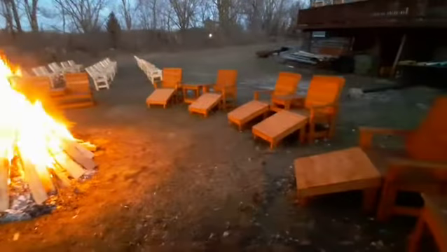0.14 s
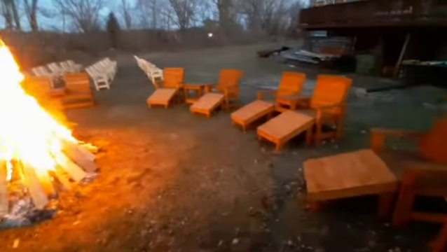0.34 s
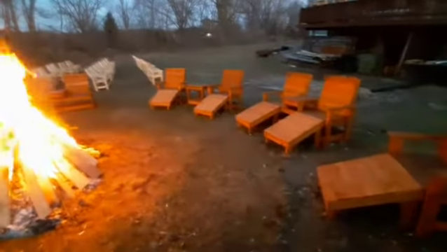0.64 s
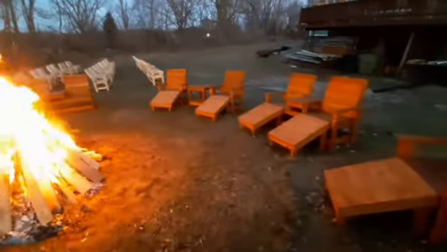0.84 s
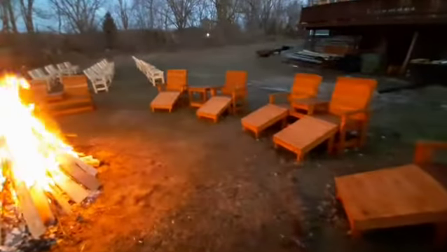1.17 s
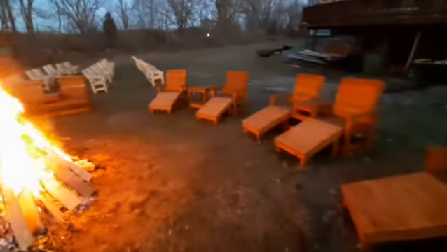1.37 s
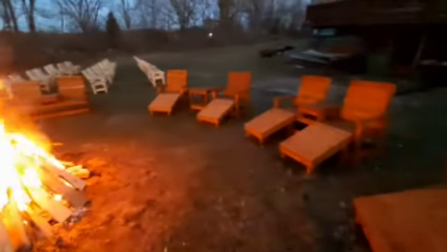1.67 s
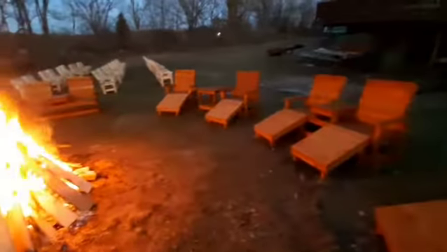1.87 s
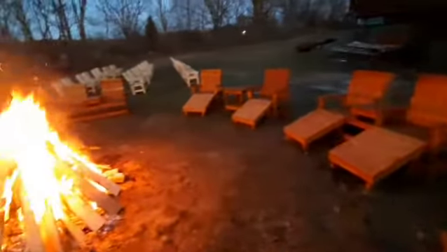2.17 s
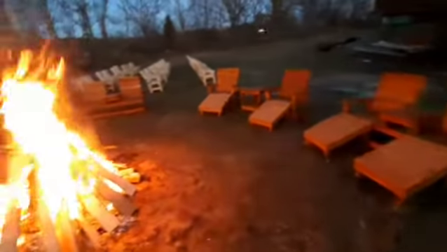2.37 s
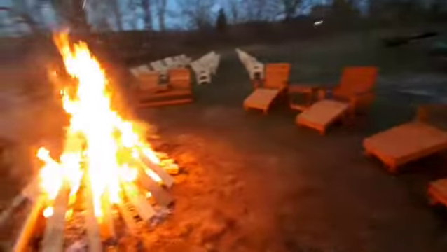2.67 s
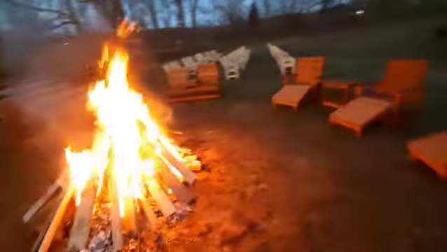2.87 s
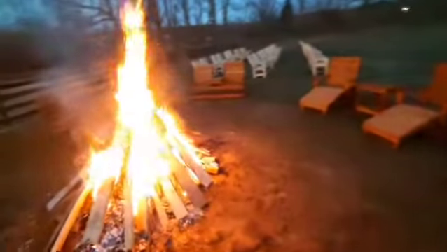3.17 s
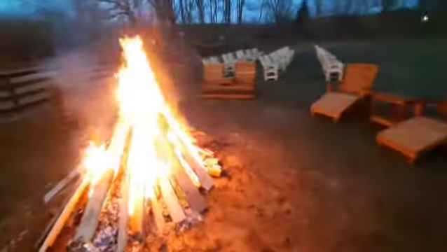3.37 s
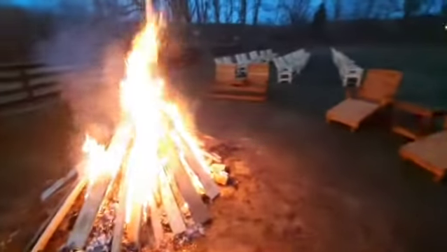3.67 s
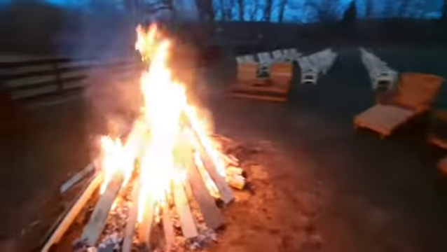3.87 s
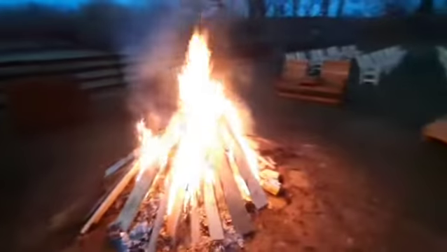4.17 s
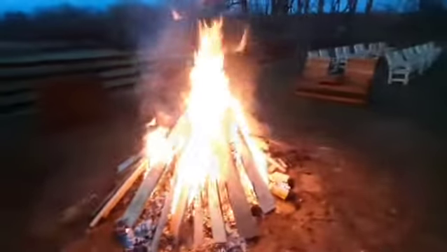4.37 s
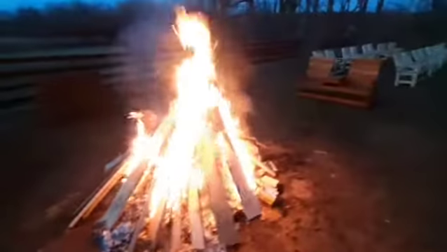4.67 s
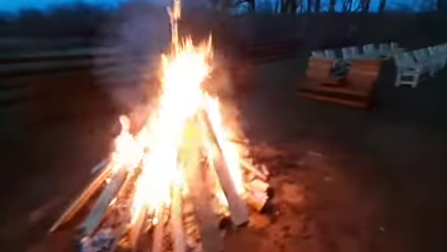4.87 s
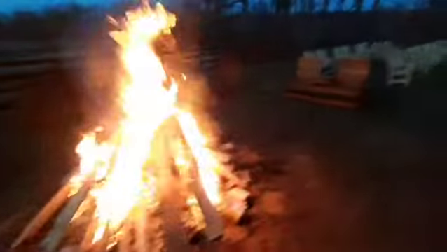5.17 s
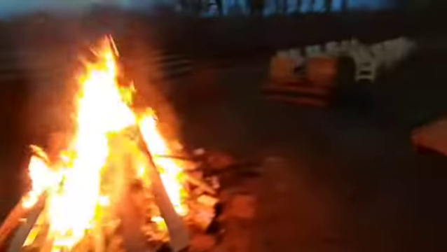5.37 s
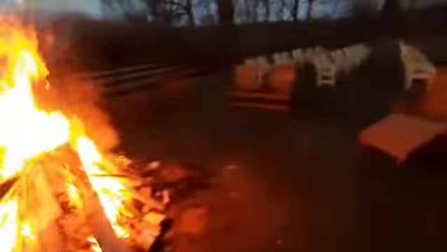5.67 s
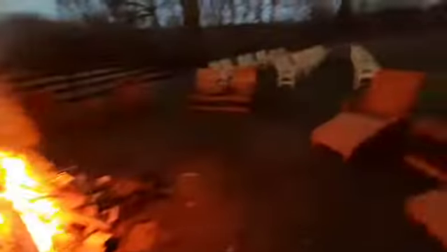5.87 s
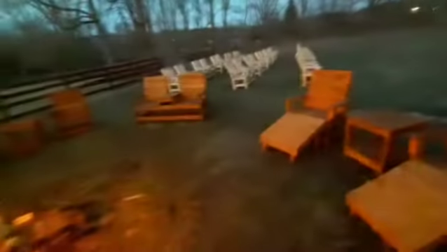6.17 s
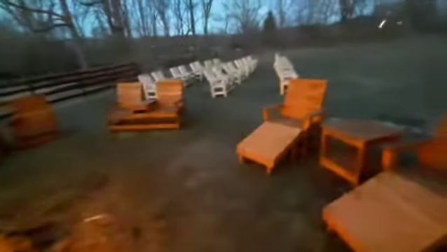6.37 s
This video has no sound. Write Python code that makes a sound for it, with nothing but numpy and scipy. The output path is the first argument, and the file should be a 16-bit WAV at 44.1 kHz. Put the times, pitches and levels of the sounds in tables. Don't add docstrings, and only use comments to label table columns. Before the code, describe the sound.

A large stack of burning planks heard from a few metres away in an open yard. A low, fluttering roar runs throughout, with soft sizzle and faint ticks. A sharp crack with a steam puff comes near two seconds, a hissy burst follows, then a very loud wooden snap at four. Afterwards the fire surges and crackles more densely. Handheld phone, stereo, dry outdoor air, no voices.

```python
import sys
import numpy as np
from scipy import signal
from scipy.fft import rfft, irfft, next_fast_len
from scipy.io import wavfile
from scipy.ndimage import uniform_filter1d, map_coordinates

SR = 44100
rng = np.random.default_rng(int(sys.argv[2]) if len(sys.argv) > 2 else 0)


def wav_out(sig):
    wavfile.write(sys.argv[1], SR, np.round(np.clip(np.atleast_2d(sig).T, -1, 1) * 32767).astype(np.int16))


def nominal_scale(level):
    x = np.asarray(level, float) / 20
    return 10 ** x


N = 287720
SIDE = np.array([[.5], [-.5]])


def read(table, hz):
    f, v = np.transpose(table)
    return np.interp(np.log(hz + 1), np.log(f + 1), v)


def walk(rate_hz):
    hold = int(SR / rate_hz)
    w = np.repeat(rng.standard_normal(3000), hold)[:N]
    w = uniform_filter1d(uniform_filter1d(w, hold), hold)
    return w / w.std()


def causal(db):
    c = irfft(db * np.log(10) / 20)
    c[1:len(c) // 2] *= 2
    c[len(c) // 2 + 1:] = 0
    return np.exp(rfft(c))


BORDERS = (400, 2450, 9000)


def shares(hz, steep=6):
    above = [1 / (1 + (edge / (hz + 1)) ** steep) for edge in BORDERS]
    return np.sqrt([1 - above[0], above[0] - above[1], above[1] - above[2], above[2]])


def add(out, start_s, sound):
    i = max(int(start_s * SR), 0)
    out[:, i:i + sound.shape[1]] += sound[:, :N - i]


# pitch_hz, width_hz, lift_db
CASE_CAVITIES = [(1543, 127, 8.5), (2024, 53, 9)]


def case_db(hz):
    return sum(db / (1 + (2 * (hz - f) / w) ** 2) for f, w, db in CASE_CAVITIES)


# pitch_hz, likeness_0_to_1
PORT_LIKENESS = [(30, .86), (70, .92), (140, .96), (290, .9), (640, .55), (1400, .1), (3000, .05)]


def couple(first, second, like):
    return like * first + np.sqrt(1 - like ** 2) * second


def patches(x, depth_db, per_s, per_octave, size=512):
    hz, t, z = signal.stft(x, SR, nperseg=size)
    at = np.meshgrid(per_octave * np.log2(1 + hz / 100), per_s * t, indexing="ij")
    field = map_coordinates(rng.standard_normal((60, 400)), at, order=1)
    reach = np.minimum(hz / 500, 1) / (1 + (hz / 9000) ** 2)
    z = z * nominal_scale(depth_db * (reach[:, None] * field / field.std()))
    return signal.istft(z, SR, nperseg=size)[1][:, :N]


# time_s, flames_db, boiling_sap_db
FIRE_DRIVE = [(0.0, -56.5, -80), (0.25, -56.5, -77.5), (0.4, -57.5, -73), (0.63, -56, -76),
              (0.94, -57.5, -78.5), (1.18, -54.5, -76), (1.32, -55.5, -68), (1.63, -59, -75.5),
              (2.09, -55, -75.5), (2.27, -54.5, -71), (2.67, -56.5, -73.5), (4.28, -54.5, -65),
              (4.7, -54, -71.5), (5.06, -51.5, -65.5), (5.47, -53, -69.5), (5.79, -51.5, -67),
              (5.97, -53, -70), (6.52, -52, -71)]
# start_s, length_s, level_db
FLAME_SURGES = [(0.408, 0.038, -51), (0.586, 0.036, -52), (1.089, 0.038, -53), (1.172, 0.102, -49),
                (1.368, 0.074, -51), (1.899, 0.04, -53), (1.957, 0.04, -50), (2.118, 0.042, -48),
                (2.186, 0.066, -51), (2.447, 0.102, -50), (2.651, 0.032, -52), (2.717, 0.062, -50),
                (2.811, 0.09, -52), (3.204, 0.044, -50), (3.266, 0.074, -52), (3.493, 0.074, -49),
                (3.621, 0.134, -50), (3.894, 0.056, -46), (3.966, 0.126, -49), (4.136, 0.048, -47),
                (4.205, 0.12, -48), (4.355, 0.072, -53), (4.449, 0.064, -48), (4.553, 0.118, -44),
                (4.69, 0.052, -47), (4.758, 0.032, -51), (4.83, 0.058, -49), (4.956, 0.07, -52),
                (5.044, 0.054, -51), (5.113, 0.156, -47), (5.293, 0.062, -48), (5.391, 0.092, -46),
                (5.574, 0.054, -50), (5.646, 0.096, -49), (5.778, 0.188, -48), (6.045, 0.066, -52),
                (6.233, 0.17, -47), (6.456, 0.034, -47)]


def surges(margin_db=-3, share=.45, longer_s=.04):
    t, db = np.arange(N) / SR, np.zeros(N)
    blaze_s, blaze_db = np.transpose(FIRE_DRIVE)[:2]
    for s, length, level_db in FLAME_SURGES:
        u = np.clip((t - s + longer_s / 2) / (length + longer_s), 0, 1)
        lift_db = share * (level_db - np.interp(s, blaze_s, blaze_db) - margin_db)
        db = np.maximum(db, lift_db * np.sqrt(np.sin(np.pi * u) + 1e-12))
    return db - db.mean()


# pitch_hz, level_db (per Hz)
FLAME_TONE = [(15, -45), (28, -18), (45, -4), (70, 2.5), (105, -1.5), (200, -12), (300, -20.5),
              (400, -29.5), (900, -34.5), (1500, -35.5), (2200, -41), (2700, -90)]
# pitch_hz, level_db (per Hz)
SAP_TONE = [(2300, 3), (2800, -0.5), (3400, 2.5), (5500, -0.5), (7900, -1), (8250, -26), (9000, -16.5),
            (10400, -5), (11500, 1), (13500, 4), (15800, 5), (16000, -24)]
# level_db, flames_follow (dB per dB), sap_follow (dB per dB)
BED_LAYERS = [
    (-51.2, 1.04, 0.06),
    (-67.5, 1.02, 0.55),
    (-73, -0.19, 1.03),
    (-75.5, 0.7, 0.75),
]


def bed(flicker_db=(.8, 1.1, 1.1, .8), flicker_hz=(9, 14, 25, 25), gust_db=.5, grain_db=(0, 0, 1.97, 1.97),
        left_db=(-.6, -2.2, -3.1, -2.1)):
    n = next_fast_len(N)
    hz = np.arange(n // 2 + 1) * SR / n
    like = np.clip(read(PORT_LIKENESS, hz), 0, 1)
    mid, side = rfft(rng.standard_normal((2, n)))
    pair = np.array([mid * np.sqrt(1 + like) + sign * side * np.sqrt(1 - like) for sign in (1, -1)])
    flames = nominal_scale(read(FLAME_TONE, hz) + case_db(hz))
    sap = nominal_scale(read(SAP_TONE, hz))
    s, blaze, flow = np.transpose(FIRE_DRIVE)
    gust = gust_db * walk(9.2)
    out = 0
    for k, (mask, (level_db, by_flames, by_sap)) in enumerate(zip(shares(hz), BED_LAYERS)):
        layer = irfft(pair * mask * (flames if k < 2 else sap), n)[:, :N]
        drive_db = level_db + by_flames * (blaze - blaze.mean()) + by_sap * (flow - flow.mean())
        db = np.interp(np.arange(N) / SR, s, drive_db) + flicker_db[k] * walk(flicker_hz[k])
        db = db + (gust if k else surges())
        db = db + grain_db[k] * np.clip(walk(380) - .6, 0, 1.7) ** 2
        out = out + layer / layer.mean(0).std() * nominal_scale(db + left_db[k] * SIDE)
    return patches(out, depth_db=2.2, per_s=8, per_octave=2.48)


# pitch_hz, level_db (per Hz)
CRACK_TONE = [(250, -29), (500, -5), (1200, -3.5), (2000, -3.5), (2800, -6), (4400, -6), (6200, -2.5),
              (7800, -4.5), (8400, -17), (10000, -9), (11200, -5), (13500, 3.5), (15900, -9),
              (16700, -28.5)]
# pitch_hz, left_minus_right_db
PORT_BALANCE = [(60, 22), (110, 28), (200, 27), (380, -7), (700, -3), (1290, -11.5), (2380, -8.5),
                (4400, -17.5), (8120, -8), (15000, -6)]
# delay_ms, level_db
REFLECTIONS = [(2.6, -17), (10, -23), (21, -26)]


def cracks(rows, lag_ms=0.257, alike=0.53, rough_db=1.5, tail_ms=17,
           knock_db=13, spit_db=9, ring_db=5, ring_octaves=0.18, size=4096):
    out, t = np.zeros((2, N)), np.arange(size) / SR * 1000
    hz = np.arange(size // 2 + 1) * SR / size
    tone_db = read(CRACK_TONE, hz) + case_db(hz)
    port = np.array([causal(tone_db + half * read(PORT_BALANCE, hz)) for half in SIDE[:, 0]])
    port[1] *= np.exp(-2j * np.pi * hz * lag_ms / 1000)
    echo = 1 + sum(nominal_scale(db) * np.exp(-2j * np.pi * hz * ms / 1000) for ms, db in REFLECTIONS)
    low, knock, body, spit = shares(hz)
    rise_ms, fall_ms, stop_ms, tail_db = 1.05, .95, 4.5, -38
    shape = np.minimum(t / rise_ms, 1) ** 9 * np.exp(-t / fall_ms) / (1 + (t / stop_ms) ** 12)
    for s, peak_db, low_db, top_db, pan_db, ring_hz in rows:
        noise = rng.standard_normal((5, size))
        splinters = nominal_scale(rough_db * np.repeat(noise[4, :size // 8], 8))
        burst = (alike * noise[0] + (1 - alike) * noise[:2]) * splinters * shape
        tail = nominal_scale(tail_db) * noise[2:4] * np.exp(-(t / tail_ms) ** 2)
        power = uniform_filter1d(np.abs(rfft(burst)) ** 2, size // 48)
        even = np.array([causal(-10 * np.log10(p / p.mean())) for p in power])
        z = (rfft(burst) * even * echo + rfft(tail)) * port
        ring = nominal_scale(ring_db * np.exp(-(np.log2((hz + 1) / ring_hz) / ring_octaves) ** 2))
        parts = [(low + knock, low_db + knock_db), (ring * body, 0), (spit, top_db + spit_db)]
        gain = sum(nominal_scale(db) * mask / np.linalg.norm(z * mask) for mask, db in parts)
        z = z * causal(20 * np.log10(gain))
        z = z / np.linalg.norm(z * (body + spit), axis=1, keepdims=True) * nominal_scale(pan_db * SIDE)
        high = irfft(z.mean(0) * (body + spit), size)
        add(out, s, irfft(z, size) / np.abs(high).max() * nominal_scale(peak_db))
    return out


def crackle(per_s=30, faint_db=-63, spread_db=4):
    r = rng.random((230, 6))[:int(per_s * N / SR)].T
    s = r[0] * N / SR
    lift_db = np.interp(s, [0, 3.5, 5.5, 6.52], [-5, 0, 1, 0])
    peak_db = faint_db + lift_db + spread_db * r[1] ** 2
    knock_db, spit_db, pan_db = -32 + 16 * r[2], -35 + 55 * r[3], -7 + 6 * r[4]
    ring_hz = 8000 - 5000 * r[5] ** 2
    rows = np.c_[s, peak_db, knock_db, spit_db, pan_db, ring_hz]
    return cracks(rows, ring_db=9, ring_octaves=0.18, size=1024)


# start_s, length_s, level_db,
# bright_hz (at start), lowest_hz
STEAM_JETS = [(0.234, 0.19, -60, 4950, 1340), (1.136, 0.061, -62.5, 3800, 2730),
              (1.337, 0.11, -62.5, 5000, 900), (1.783, 0.058, -62.5, 7000, 1190),
              (2.115, 0.047, -49.5, 7000, 1270), (2.145, 0.14, -58.5, 5160, 910),
              (2.678, 0.11, -46, 11900, 252), (3.416, 0.098, -60.5, 2300, 1200),
              (4.094, 0.034, -46.5, 9000, 1500), (4.114, 0.086, -57, 8000, 1500),
              (4.274, 0.18, -58.5, 5000, 1300), (4.828, 0.055, -56, 5000, 1490),
              (6.199, 0.13, -63, 6000, 1980)]


def jets(grain_db=3.0, attack=0.23, size=512, spent_hz=1200, spent_per_bass=1.2):
    out = np.zeros((2, N))
    hz = np.arange(size // 2 + 1) * SR / size
    like = read(PORT_LIKENESS, hz)
    chance = rng.standard_normal((len(STEAM_JETS), 40, 3, size))
    for (s, length, db, bright_hz, bass_hz), grains in zip(STEAM_JETS, chance):
        dull_hz = min(bright_hz, spent_hz + spent_per_bass * bass_hz)
        for u, grain in zip(np.arange(0, 1, size / 2 / SR / length), grains):
            edge_hz = bright_hz * (dull_hz / bright_hz) ** u
            colour = nominal_scale(read(CRACK_TONE, hz)) / (1 + (hz / edge_hz) ** 2) ** 0.77
            colour = colour / (1 + (bass_hz / (hz + 1)) ** 3)
            puff = rfft(grain[:2] * nominal_scale(grain_db * np.repeat(grain[2, :size // 32], 32)))
            puff[1] = couple(puff[0], puff[1], like)
            puff = irfft(puff * colour, size) / np.sqrt(np.mean(colour ** 2))
            swell = min(u / attack + .1, 1) * np.cos(np.pi / 2 * u ** 1.5) ** 1.4
            puff = puff * np.sqrt(np.hanning(size)) * swell * nominal_scale([[db - 2.5], [db + 4.0]])
            add(out, s + u * length - size / 4 / SR, puff)
    return out


# start_s, length_s, level_db, pitch_hz, rise_share (0-1)
GAS_PUFFS = [(1.135, 0.067, -64.5, 3240, 0.5), (1.202, 0.022, -48, 1430, 0.06),
             (2.69, 0.081, -49.5, 290, 0.56), (2.965, 0.01, -60, 1540, 0.19),
             (2.116, 0.049, -45.5, 235, 0.2), (2.117, 0.019, -44.5, 610, 0.04),
             (3.049, 0.15, -63.5, 1800, 0.39), (3.072, 0.12, -56, 245, 0.65),
             (3.236, 0.011, -53.5, 1790, 0.45), (3.434, 0.11, -53.5, 290, 0.17),
             (3.925, 0.15, -63, 1900, 0.82), (4.332, 0.11, -60, 1840, 0.6), (5.2195, 0.01, -52, 950, 0.1),
             (4.7, 0.11, -66, 900, 0.37), (5.46, 0.095, -61, 220, 0.18), (1.5, 0.18, -70.5, 2280, 0.42),
             (3.99, .085, -63, 2030, 0.64), (6.46, 0.09, -62.5, 2230, 0.65), (2.42, 0.12, -69, 1900, 0.4),
             (3.5, 0.11, -66, 950, 0.62), (1.34, 0.27, -68, 1380, 0.17), (2.329, 0.11, -69, 2140, 0),
             (6.202, 0.13, -60, 310, 0.3), (6.424, 0.099, -60, 1450, 0.45), (6.47, 0.08, -66, 4200, 0.44),
             (1.52, 0.14, -69.5, 1340, 0.4), (4.95, 0.3, -66.5, 560, 0.4), (1.202, 0.02, -54.5, 660, 0.09)]


def puffs(right_db=8.5, width_at_1k_hz=380):
    out = np.zeros((2, N))
    chance = rng.standard_normal((len(GAS_PUFFS), 2, SR // 2))
    for (s, length, db, hz, rise), noise in zip(GAS_PUFFS, chance):
        u = np.arange(int(length * SR)) / (length * SR)
        width_hz = width_at_1k_hz * np.sqrt(hz / 1e3)
        like = read(PORT_LIKENESS, hz)
        pair = np.array([noise[0], couple(noise[0], noise[1], like)])
        hollow = signal.butter(2, [hz - width_hz / 2, hz + width_hz / 2], "band", fs=SR, output="sos")
        air = signal.sosfilt(hollow, pair)[:, -len(u):]
        rise = np.clip(rise, .03, .9)
        swell = np.minimum(u / rise, (1 - u) / (1 - rise)) ** 1.5
        lean_db = right_db * (1 - like)
        add(out, s, air / air.std() * swell * nominal_scale([[db - lean_db], [db + lean_db]]))
    return out


def small_pan_db(start_s):
    return -5.5 + 1.1 * start_s


# start_s, peak_db
SAP_BEADS = [(0.9053, -46), (1.2042, -46), (1.2585, -51), (1.3578, -50), (1.7843, -46), (2.1176, -29),
             (2.4279, -48), (2.6419, -56), (2.6873, -39), (3.236, -50), (3.2799, -46), (3.6092, -50),
             (3.6461, -49), (3.7369, -49), (3.8921, -42), (3.9494, -50), (4.0652, -32), (4.0901, -12),
             (4.3141, -45), (4.343, -40), (4.4623, -50), (4.5271, -46), (4.588, -49), (4.7885, -42),
             (4.813, -39), (4.8788, -28), (4.9606, -46), (5.0828, -47), (5.1392, -40), (5.22, -44),
             (5.2525, -47), (5.3038, -41), (5.461, -42), (5.5104, -50), (5.5558, -49), (5.6012, -46),
             (5.7648, -38), (5.8092, -36), (5.8232, -40), (5.8326, -39), (5.8506, -35), (5.88, -21),
             (6.1609, -51), (6.2013, -47), (6.3056, -46)]


def beads(under_db=3.0, top_db=14, ceiling_db=-52):
    rows = [(s - .001, min(db, ceiling_db) - under_db, -40, top_db, small_pan_db(s), 7500)
            for s, db in SAP_BEADS]
    return cracks(rows, size=1024)


# start_s, peak_db, knock_db (below 2.5 kHz), left_minus_right_db, ring_hz
DRY_CRACKS = [(2.1176, -33, -35, -4, 4970), (4.216, -39, -41, 6, 5540), (4.3443, -32.5, -16.5, -3, 4630),
              (4.9605, -38, -23, -9, 3260), (4.9944, -51, 13, -8, 3020), (5.139, -36, -27, -3, 7150),
              (5.5109, -38.5, -21, -2, 3350), (5.933, -47.5, -11, -6, 3330), (6.2207, -47, -27, 4, 6900),
              (1.2036, -39, -4, -4, 7130), (3.8920, -33, -43, -1, 7290)]
# start_s, peak_db, knock_db (below 2.5 kHz), left_minus_right_db, ring_hz
FULL_SNAPS = [(1.3574, -50, -3, -7, 5180), (1.7846, -36, -13.5, -2, 5700), (3.13, -48.5, -1, -20, 4080),
              (3.1665, -46.5, -10, -6, 6300), (3.2367, -46.5, -3, -13, 6380), (3.7369, -41, -21, -2, 7410),
              (4.0645, -34.5, -24, -6, 6450), (4.0895, -11.5, -24, -2.5, 6000),
              (4.315, -39, -14.5, 4, 4300), (4.5262, -39, -37, 0, 7210), (4.5407, -39, -34, -2, 7851),
              (4.803, -39, -31, -6, 7280), (4.813, -33.5, -17, -1, 4850), (4.8789, -23.5, -26, -2.5, 7450),
              (5.1465, -50, -30, 1, 6690), (5.22, -41, -2, 0, 3660), (5.268, -35, -44, -4, 7090),
              (5.3028, -38.5, -31, -2, 4500), (5.7644, -33, -45, 2, 6100), (5.8092, -35, -33, 7, 6990),
              (5.8218, -32.5, -13, -14, 6270), (5.8325, -34, -14, 6, 3290), (5.8503, -32, -10, -9, 7100),
              (5.8795, -30, -22, -4, 5700)]
# start_s, peak_db, ring_hz
WET_SPITS = [(0.9048, -44.5, 3250), (1.258, -47, 3410), (2.4279, -50, 5933), (2.506, -52, 7040),
             (2.6862, -34.5, 7140), (3.0388, -50, 6840), (3.2790, -38, 7130), (4.463, -45, 4900),
             (5.0838, -42, 7730), (5.2814, -49, 4060), (5.6024, -43, 3160), (5.7555, -47, 6790),
             (6.201, -43, 3740)]
# start_s, peak_db, ring_hz
SMALL_TICKS = [(0.038, -50.5, 6800), (0.7685, -53, 7500), (2.5416, -47, 6320), (3.407, -47, 7500),
               (3.6463, -45.5, 7050), (4.6758, -47, 7320), (5.0215, -45, 7160), (5.2525, -53, 4270),
               (5.37, -44, 7170), (5.4264, -44.5, 6520), (5.4607, -40.5, 6490), (5.556, -51, 7220),
               (6.1607, -47.5, 7470), (6.3053, -46, 3360), (6.4343, -64, 5300), (0.1777, -56, 7360),
               (2.3273, -49, 7230), (2.8456, -52, 4720), (3.6089, -47, 7280), (3.6815, -46, 7600),
               (3.7044, -43, 4680), (3.8813, -46, 7560), (3.9411, -44, 7420), (4.7453, -51, 6830),
               (4.8301, -46, 4260), (5.6343, -49, 6790), (1.96, -52, 7200)]
POP_TREBLE = (-42, -7.5, 7, -10.5)


def pops(small_knock_db=-46):
    big, small = [], []
    for rows, spit_db in zip((DRY_CRACKS, FULL_SNAPS), POP_TREBLE[:2]):
        big += [(s, db, knock_db, spit_db, pan_db, hz) for s, db, knock_db, pan_db, hz in rows]
    for rows, spit_db in zip((WET_SPITS, SMALL_TICKS), POP_TREBLE[2:]):
        small += [(s, db, small_knock_db, spit_db, small_pan_db(s), hz) for s, db, hz in rows]
    return cracks(big) + cracks(small, ring_db=13, ring_octaves=0.29, size=2048)


# start_s (left port), right_late_ms, second_split_ms (after first), second_level_db
PLANK_BANGS = [
    (4.0906, 0.078, 0.447, -10.5),
    (5.88036, 0.34, 0.68, -20),
    (2.11828, 0.272, 0.8, -7),
    (4.96139, 0.31, 0.71, -15),
    (5.14014, 0.3, 0.95, -15.5),
]
# pitch_hz, left_db, right_db, t60_ms
PLANK_MODES = [
    [(780, -30, -28, 11), (1270, -23, -25, 9), (1710, -23, -20, 9.9), (2030, -24, -21.5, 10.6),
     (2500, -29, -31, 6), (3400, -35, -18, 14), (4330, -22, -10, 9), (5150, -19, -14, 9.6),
     (6030, -20, -15.5, 15), (7370, -21, -14, 9), (9500, -21, -21, 4.5), (11030, -26, -15, 10),
     (12900, -22, -21, 8), (15160, -21, -19, 10)],
    [(360, -39.5, -39.5, 12.4), (1680, -24.0, -18.5, 6.3), (2200, -33.5, -29.0, 10.0),
     (3490, -25.5, -19.0, 7.0), (4510, -28.5, -19.0, 6.4), (4960, -22.5, -17.5, 5.7),
     (5680, -17.5, -16.5, 4.8), (6540, -31.0, -22.5, 8.7), (7270, -24.5, -32.0, 6.0),
     (8060, -36.0, -27.0, 7.0), (10140, -24.0, -30.0, 5.0), (12290, -27.0, -20.0, 6.9),
     (13880, -24.0, -19.5, 6.0), (15370, -25.5, -18.5, 7.2)],
    [(690, -37.5, -32.0, 20.0), (1870, -39.0, -30.5, 8.9), (2350, -45.0, -42.0, 20.0),
     (3040, -44.0, -30.5, 19.9), (4210, -30.5, -26.0, 10.0), (4830, -30.5, -26.5, 8.7),
     (5710, -33.0, -23.0, 11.4), (6770, -30.0, -25.5, 10.2), (7760, -30.5, -31.0, 6.2),
     (10770, -30.5, -31.0, 3.3), (11990, -37.5, -33.5, 13.6), (13120, -42.0, -36.5, 19.6),
     (14380, -35.0, -30.0, 12.1), (15550, -40.5, -34.5, 11.9)],
]
# pitch_hz, left_db, right_db, t60_ms
THIN_MODES = [
    [(1170, -38.5, -36.5, 3.0), (1450, -43.5, -48.0, 16.0), (2050, -35.5, -37.5, 9.5),
     (3240, -52.0, -30.0, 11.7), (4120, -38.0, -28.5, 5.6), (4810, -41.0, -46.5, 20.0),
     (5300, -32.0, -40.0, 8.0), (6510, -40.0, -34.0, 9.2), (7480, -41.0, -40.5, 8.7),
     (12890, -49.5, -37.0, 3.0), (15160, -40.0, -42.5, 5.5)],
    [(950, -36.5, -34.0, 5.9), (1560, -36.0, -42.5, 12.0), (3140, -51.5, -31.5, 8.0),
     (4320, -39.5, -30.5, 6.1), (5700, -39.5, -35.5, 10.8), (6030, -35.5, -37.5, 6.5),
     (6940, -28.5, -28.5, 7.1), (7690, -33.0, -39.5, 6.7), (10650, -37.5, -35.5, 3.0),
     (12920, -41.5, -35.5, 6.2), (15160, -42.0, -39.5, 3.6)],
]


def bangs(rise_ms=0.065, detune=0.011, size=2048):
    out = np.zeros((2, N))
    for (s, late_ms, again_ms, again_db), modes in zip(PLANK_BANGS, PLANK_MODES + THIN_MODES):
        hz, left_db, right_db, t60_ms = np.transpose(modes)[:, :, None]
        sign = (-1) ** np.arange(len(modes))[:, None]
        sound = np.zeros((2, size))
        for after_ms, db in ((0, 0), (again_ms, again_db)):
            for k, port_db in enumerate((left_db, right_db)):
                t = np.maximum(np.arange(size) / SR * 1000 - after_ms - k * late_ms, 0)
                mode_hz = hz * (1 + detune * rng.standard_normal((len(modes), 1)))
                ring = sign * np.sin(2 * np.pi * mode_hz * t / 1000)
                decay = nominal_scale(db + port_db - 60 * t / t60_ms)
                sound[k] += (ring * decay).sum(0) * (1 - np.exp(-t / rise_ms))
        add(out, s, sound)
    return out


def scene():
    soft = signal.ellip(10, .2, 60, 15950, fs=SR, output="sos")
    background = bed() + crackle() + jets() + puffs()
    return signal.sosfilt(soft, background) + pops() + bangs() + beads()


def roll_off(x):
    return signal.sosfilt(signal.butter(12, 17000, fs=SR, output="sos"), x)


def record(dry):
    top = signal.ellip(8, .2, 70, 16800, fs=SR, output="sos")
    return roll_off(signal.sosfilt(top, dry))


dry = scene()
out = record(dry)
wav_out(out)
```